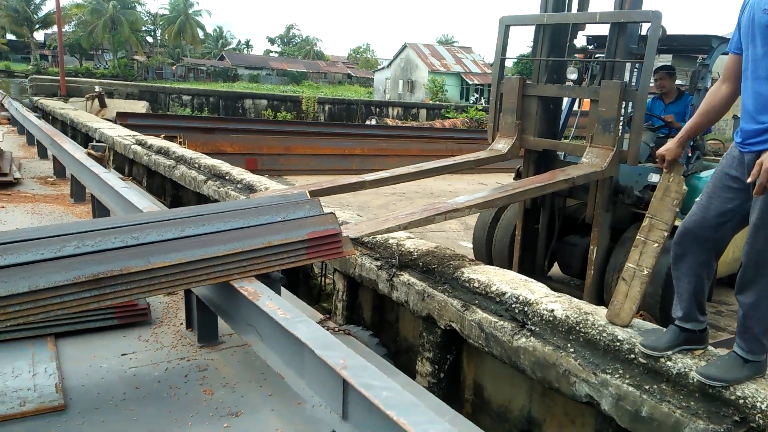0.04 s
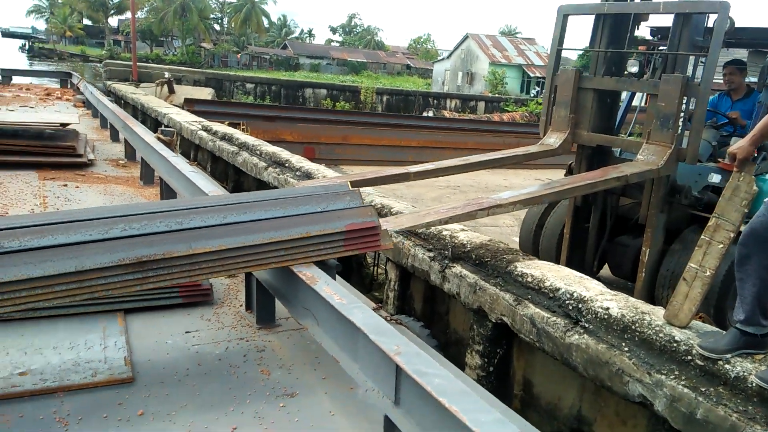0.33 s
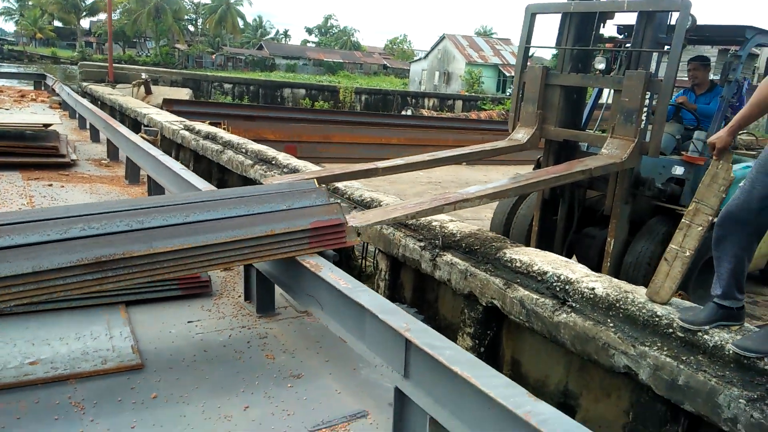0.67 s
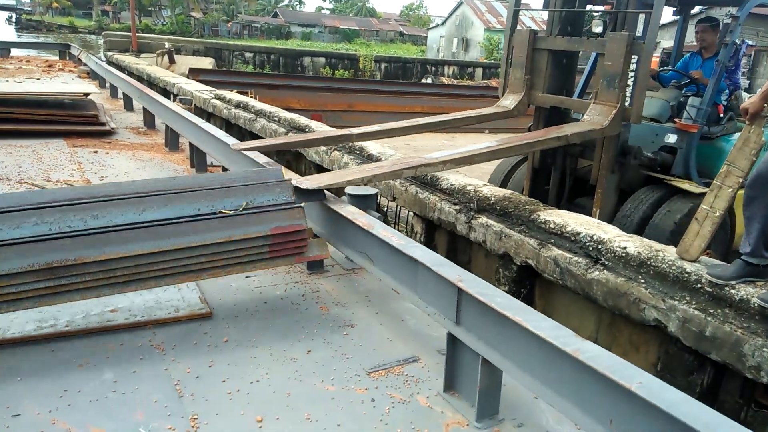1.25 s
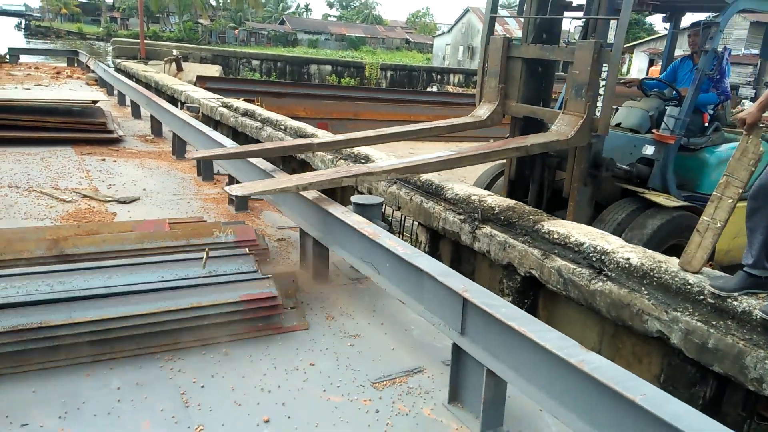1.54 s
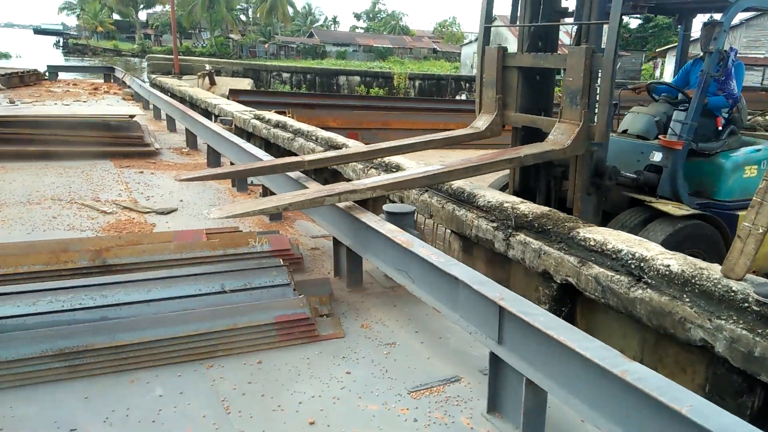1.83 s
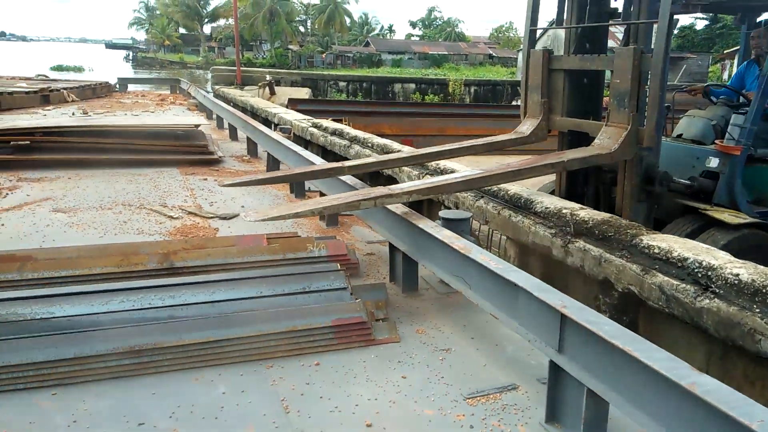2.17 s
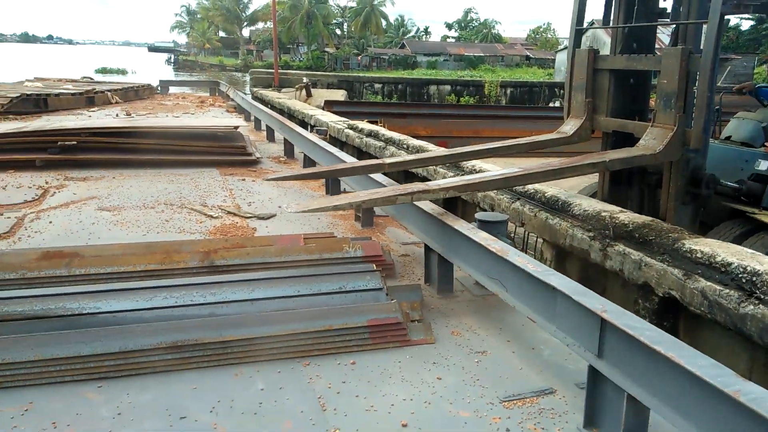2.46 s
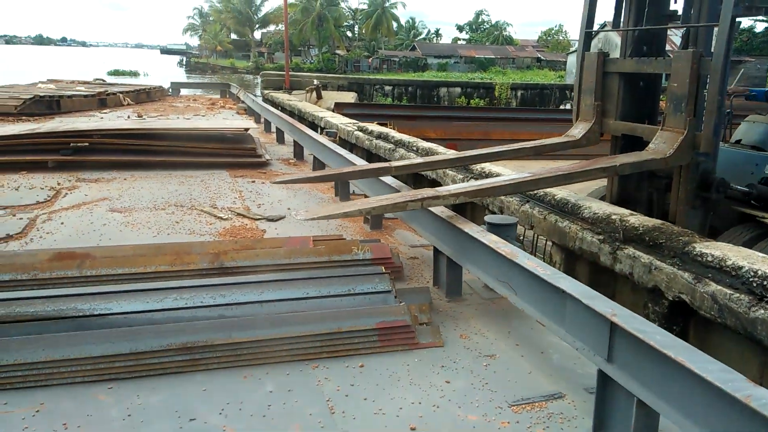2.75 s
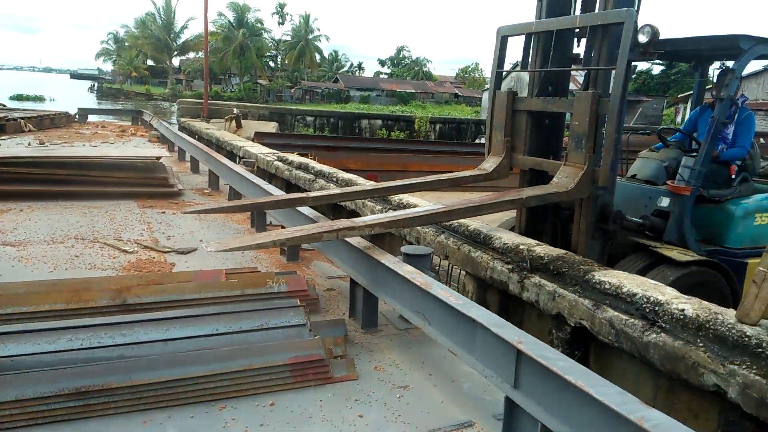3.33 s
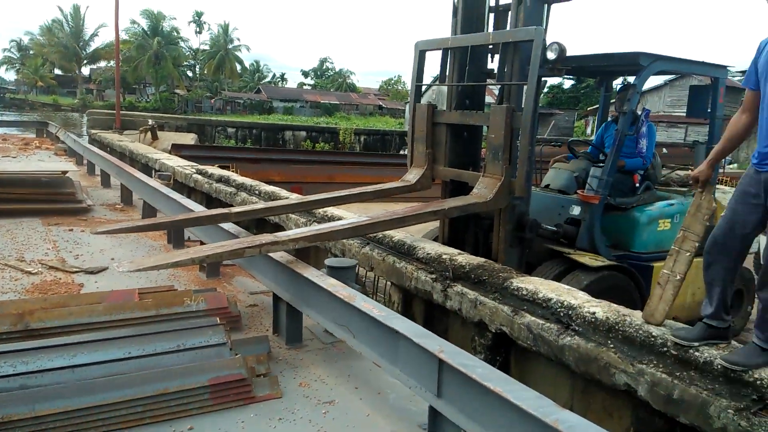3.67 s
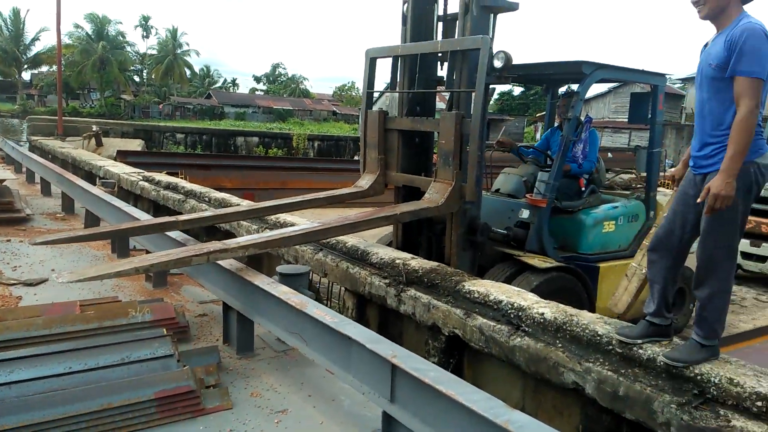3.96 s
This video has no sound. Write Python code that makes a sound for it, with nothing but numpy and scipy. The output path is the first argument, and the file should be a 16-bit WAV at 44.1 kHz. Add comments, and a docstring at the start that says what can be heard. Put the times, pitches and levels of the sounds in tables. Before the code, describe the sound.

Steel plates scrape haltingly off a chugging forklift, growing louder from about 0.5 seconds. At 1.3 seconds they crash onto a barge, clattering and ringing loudly until 2 seconds, while the hollow hull booms until about 2.5. The stack shifts again around 2.3 seconds. The engine puffs on more quietly under a faint hiss, with a knock from the empty forks at 3.3 seconds and a small tick at 3.6.

```python
"""At the quayside, in the open air: a forklift runs while steel plates scrape off its forks onto a barge.
The plates stick and slip, then crash, clatter and ring; the hollow hull booms, and the stack shifts once
more before it lies still. The engine puffs on more quietly, with a knock and a tick from the empty forks.
The sound sits in the centre, wide only in the treble, over a faint hiss. A limiter holds the crash down."""
import sys
import numpy as np
from scipy import signal
from scipy.fft import rfft, irfft
from scipy.io import wavfile
from scipy.ndimage import uniform_filter1d, minimum_filter1d

SR = 44100
rng = np.random.default_rng(int(sys.argv[2]) if len(sys.argv) > 2 else 0)


def int16_out(signal):
    """Quantize to a 16-bit WAV file."""
    q = np.round(np.clip(np.atleast_2d(signal).T, -1, 1) * 32767)
    wavfile.write(sys.argv[1], SR, q.astype(np.int16))


N = 176400

# single blows of steel on steel: (time [s], force [dB], hardness [dB], ringing [dB], pitch [Hz])
STEEL_BLOWS = [(.866, -32, -37, -16.5, 910), (1.105, -33.5, -4, -28, 2250), (1.273, -31, -14, -17, 2020),
               (1.3397, -13.5, -15, -20, 1056), (1.5014, -10, -6, -4.5, 972), (1.552, -6, -1, -20, 4224),
               (1.5555, -6.5, -15, -12, 1420), (1.6333, -14, -4, -6, 4300), (1.6623, -7.5, -1, -24, 1420),
               (1.7169, -11, -2, -5, 5300), (1.8199, -11, -6, -11.5, 4200), (1.835, -10, -30, -24, 6600),
               (1.8601, -13, -7, -10, 2160), (1.9491, -14, -20, -28, 4200), (2.006, -25, -27, -19.5, 1211),
               (2.2093, -23.5, -15, -34, 4530), (2.2612, -33.5, -4, -19.5, 1700),
               (2.2948, -24, -11, -35, 3370), (2.326, -36, -9, -28.5, 5900)]


def from_db(db):
    """Decibels to gain."""
    return 10 ** (np.asarray(db) / 20)


def rms_one(x):
    """Scale to rms 1."""
    return x / np.sqrt(np.mean(x ** 2) + 1e-20)


def in_time(rows):
    """Each column of a curve, sample by sample."""
    times, *columns = np.transpose(rows)
    return [np.interp(np.arange(N) / SR, times, column) for column in columns]


def during(rows):
    """A soft gate, open for the length of a curve."""
    t = np.arange(N) / SR
    return uniform_filter1d(1. * ((t >= rows[0][0]) & (t <= rows[-1][0])), size=800)


def evened(x, seconds):
    """Hold the running level at 1 and keep the fine grain."""
    power = uniform_filter1d(np.mean(np.atleast_2d(x) ** 2, axis=0), int(seconds * SR))
    return x / np.sqrt(np.abs(power) + 1e-12)


def noise(spectrum, size):
    """Stereo noise of a given colour, wide only in the treble."""
    # stereo width: (frequency [Hz], side minus mid [dB])
    stereo_width = [(2500, -70), (4000, -45), (6000, -13.5), (10000, -3.5)]
    log_hz = np.log(np.arange(size // 2 + 1) * SR / size + 1)
    gain, width = [from_db(np.interp(log_hz, np.log(hz), db))
                   for hz, db in (np.transpose(spectrum), np.transpose(stereo_width))]
    mid, side = rfft(rng.standard_normal((2, size))) * gain
    mid, side = irfft(mid, size), irfft(side * width, size)
    return (mid + side * [[1], [-1]]) / mid.std()


def contacts(per_s, spread_db):
    """Random touches, mostly small, a few large."""
    sizes = from_db(spread_db * np.minimum(rng.exponential(1, N), 4)) * rng.choice([-1, 1], N)
    return sizes * (rng.random(N) < per_s / SR)


def ring(clicks, hz, t60):
    """A unit click sets a decaying sine of height 1 ringing."""
    radius, angle = np.exp(-np.log(1000) / (t60 * SR)), 2 * np.pi * hz / SR
    return signal.lfilter([0, np.sin(angle)], [1, -2 * radius * np.cos(angle), radius ** 2], clicks + 1e-18)


def resonate(x, hz, width_hz):
    """One resonance, rms 1."""
    return rms_one(signal.lfilter(*signal.iirpeak(hz, hz / width_hz, fs=SR), x))


def bass_only(x):
    """Keep the range of a big hollow body."""
    return signal.sosfilt(signal.butter(4, [51, 230], "band", fs=SR, output="sos"), x)


def thicket(spectrum, t60):
    """Countless close modes swell within one cycle of the strongest and die together."""
    t = np.arange(2 ** 14) / SR
    strongest_hz = max(spectrum, key=lambda point: point[1])[0]
    swell = 1 - np.exp(-(t * strongest_hz) ** 2)
    return noise(spectrum, len(t)) * np.exp(-np.log(1000) * t / t60) * swell


def stack(clicks, colour, t60, plates, changes_per_s=70):
    """Contacts pass from plate to plate, and each plate has modes of its own."""
    touched = np.cumsum(rng.random(N) < changes_per_s / SR) % plates
    return sum(signal.fftconvolve([clicks * (touched == k)], thicket(colour, t60), axes=1)[:, :N]
               for k in range(plates))


def clink(at_s, db, hz, spread_octaves, t60, modes=16, swell_s=0.0024):
    """A cluster of close modes around one pitch, struck once."""
    mode_hz = hz * 2 ** (spread_octaves * rng.uniform(-1, 1, modes))
    t, start = np.arange(2 ** 13) / SR, int(at_s * SR)
    envelope = np.exp(-np.log(1000) * t / t60) * (1 - np.exp(-t / swell_s))
    cluster = envelope * (rng.standard_normal(modes) @ np.sin(2 * np.pi * np.outer(mode_hz, t)))
    out = np.zeros(N + SR)
    out[start:start + len(t)] = from_db(db) * rms_one(cluster) * np.sqrt(np.mean(envelope ** 2) / 2)
    return out[:N]


def hiss():
    """Faint treble hiss in the background sinks after the crash and comes back."""
    # course of the hiss: (time [s], level [dB])
    levels = [(0, -58), (1.2, -51), (2.1, -60.5), (2.6, -78), (2.9, -82), (2.96, -71.5), (3.12, -74.5),
              (3.3, -62.5), (3.65, -59), (4, -63)]
    # its colour: (frequency [Hz], relative density [dB])
    colour = [(1500, -9), (2400, -2), (3400, 0.5), (4900, 2.5), (6000, -6), (9000, -4.5), (11000, -15.5),
              (14500, -13.5)]
    return from_db(in_time(levels)[0]) * noise(colour, N)


def forklift(firings_per_s=29.6, jitter_cycles=0.049, spread_db=4.5, roughness=0.85, pulsing=0.22):
    """Uneven firings puff through the exhaust, shake the frame and pulse the mechanical clatter."""
    # the exhaust: (time [s], level [dB])
    exhaust_levels = [(0, -19.5), (.45, -20.5), (.6, -19), (1.04, -21.5), (1.2, -26), (1.33, -29),
                      (1.42, -40), (2.75, -31.5), (2.9, -40.5), (2.96, -30), (3.14, -35), (3.2, -39),
                      (3.28, -34.5), (3.48, -36.5), (3.51, -43.5), (3.82, -42), (3.88, -33.5), (4, -37)]
    # resonances of its pipe: (frequency [Hz], width [Hz], relative level [dB])
    pipe_modes = [(57, 11.7, 0), (78.2, 6.3, 3.5), (115.2, 19, 1.5), (133, 16, -5), (157.9, 8.2, -6.5)]
    # rumble of the frame: (frequency [Hz], relative density [dB])
    rumble_colour = [(25, -2), (160, 5), (235, 1), (290, 8), (450, 5), (700, -7), (2000, -49.5)]
    # clatter of the engine's moving parts: (time [s], level [dB])
    machinery_levels = [(0, -35.5), (1.1, -36.5), (2.2, -43.5), (2.75, -52), (3.05, -49), (3.65, -47),
                        (4, -49.5)]
    # its colour: (frequency [Hz], relative density [dB])
    machinery_colour = [(500, -9.5), (850, 7), (1150, 2), (1650, -6), (2000, -18.5), (2500, -22),
                        (4500, -65)]
    exhaust_db, = in_time(exhaust_levels)
    cycles = firings_per_s * np.arange(N) / SR
    firing = cycles.astype(int)
    timing, strength = rng.standard_normal((firing[-1] + 1, 2)).T
    phase = (cycles + jitter_cycles * timing[firing]) % 1
    puffs = from_db(spread_db * strength[firing]) * np.exp(-phase / 0.24)
    puffs = rms_one(uniform_filter1d(puffs, size=130))
    drive = rms_one(bass_only(puffs)) + roughness * rms_one(bass_only(rng.standard_normal(N)))
    pipe = sum((-1) ** k * from_db(db) * resonate(drive, hz, width)
               for k, (hz, width, db) in enumerate(pipe_modes))
    exhaust = from_db(exhaust_db) * evened(bass_only(pipe), seconds=0.044)
    rumble = from_db(1.477 * exhaust_db + 2.5) * noise(rumble_colour, N)  # grows faster than the exhaust
    machinery = from_db(in_time(machinery_levels)[0]) * noise(machinery_colour, N)
    return exhaust + (rumble + machinery) * rms_one(1 + pulsing * puffs)


def forks(overtone_ratio=1.55, overtone_db=-6.5, spread_octaves=0.302, t60=0.12):
    """The empty forks knock in their carriage: a short cluster of modes and its overtone."""
    # a knock and a tick: (time [s], level [dB], pitch [Hz])
    knocks = [(3.301, -28, 1021), (3.568, -45, 3400)]
    return sum(clink(at_s, db, hz, spread_octaves, t60)
               + clink(at_s, db + overtone_db, hz * overtone_ratio, spread_octaves, t60)
               for at_s, db, hz in knocks)


def slide():
    """The stack sticks and slips along the forks."""
    # the scrape: (time [s], level [dB])
    levels = [(0, -46), (.55, -33), (.74, -31), (.88, -24.5), (1.06, -24), (1.15, -31.5), (1.26, -22),
              (1.45, -36)]
    # its colour: (frequency [Hz], relative density [dB])
    colour = [(300, -6.5), (750, -0.5), (900, 8.5), (1150, -2.5), (1500, -2.5), (1800, -11), (2400, -12.5),
              (3100, -43), (14000, -53)]
    scrape = stack(contacts(per_s=900, spread_db=1.5), colour, t60=0.078, plates=2)
    return during(levels) * from_db(in_time(levels)[0]) * evened(scrape, seconds=0.054)


def hull():
    """The bouncing stack shakes the hollow barge, whose low modes swell and beat."""
    # the boom: (time [s], level [dB])
    levels = [(1.4, -62), (1.5, -27), (1.62, -11.5), (1.75, -14.5), (1.95, -16), (2.04, -12.5), (2.17, -11),
              (2.23, -15.5), (2.48, -17.5), (2.56, -26.5), (2.9, -46.5)]
    # modes of the hull: (frequency [Hz], width [Hz], relative level [dB])
    modes = [(73, 12, -3), (77.1, 11, -2.5), (100, 5.7, 5.5), (114.8, 7.4, 3), (132.4, 4.4, 5),
             (167, 7.3, -14), (191.2, 3.9, -5)]
    bounces = contacts(per_s=200, spread_db=3)
    boom = sum(from_db(db) * evened(resonate(bounces, hz, width), seconds=0.46) for hz, width, db in modes)
    return during(levels) * from_db(in_time(levels)[0]) * evened(bass_only(boom), seconds=0.089)


def plate_ringing(reach_octaves=0.08):
    """Each blow clinks at the pitch of its place of contact; long modes near that pitch swell and beat."""
    # long modes of the plates, in close pairs: (frequency [Hz], beat [Hz], gain [dB], t60 [s])
    mode_pairs = [(1211, 2.05, -3.5, 1.4), (1665, 6.2, -2, 0.35), (4240, 26, -9, .37),
                  (4120, 6.9, -9.5, .35), (6578, 46, -7.5, 0.52), (6600, 4.8, -11.5, 0.55)]
    times, _, _, ring_db, pitch_hz = np.transpose(STEEL_BLOWS)
    out = sum(clink(at_s, db - 1, hz, spread_octaves=0.09, t60=0.13) for at_s, _, _, db, hz in STEEL_BLOWS)
    for hz, beat_hz, db, t60 in mode_pairs:
        nearness = np.exp(-(np.log2(hz / pitch_hz) / reach_octaves) ** 2)
        clicks = np.zeros(N)
        clicks[(times * SR).astype(int)] = from_db(ring_db + db) * nearness
        out += ring(clicks, hz, t60) - ring(clicks, hz + beat_hz, t60)
    return out


def blows(times, levels_db, colour, t60):
    """Each blow wakes a thicket of modes of its own."""
    out = np.zeros((2, N + SR))
    for at_s, db in zip(times, levels_db):
        start, body = int(at_s * SR), thicket(colour, t60)
        out[:, start:start + body.shape[1]] += from_db(db) * body
    return out[:, :N]


def plate_crash(even_s=0.088):
    """Plates thud on the deck and chatter on one another; harder contacts wake the higher registers."""
    # the falling stack: (time [s], force [dB], hardness of the contacts [dB], thud level [dB])
    fall = [(1.22, -47, -13, -58), (1.275, -21.5, -18.5, -25.5), (1.296, -17.5, -31, -14.5),
            (1.355, -9, -18, -17.5), (1.435, -13.5, -22.5, -25.5), (1.452, -10, -17.5, -6),
            (1.495, -9.5, -8.5, -13.5), (1.515, -9.5, -3, -12.5), (1.66, -4.5, -6, -7.5),
            (1.705, -6.5, -9, -10), (1.85, -12.5, -9, -16), (1.92, -13, -14, -22), (2.01, -13.5, -18, -25),
            (2.06, -24, -21.5, -20), (2.2, -41, -31, -27.5), (2.225, -29.5, -12, -20.5),
            (2.285, -18, -20.5, -23.5), (2.355, -29.5, -5.5, -32), (2.39, -27.5, -14, -37.5),
            (2.43, -41.5, -18.5, -36), (2.7, -78, -21, -72)]
    # four registers of the stack, low to high: (frequency [Hz], relative density [dB])
    thud = [(90, -37.5), (180, -0.5), (230, -5), (310, 3), (450, 10.5), (620, -3), (900, -12.5),
            (2000, -54.5)]
    clang = [(250, -25.5), (800, -5), (1000, 1), (1250, 2), (1500, -1.5), (1900, -8), (2500, -17.5),
             (3300, -27.5), (12000, -66.5)]
    clash = [(1200, -19), (2500, 5), (3100, -0.5), (3700, -4.5), (4300, 3), (5300, -1), (6400, -8),
             (7500, -17.5), (10000, -21.5), (14000, -38.5)]
    sizzle = [(3500, -20), (6000, 4), (7500, 2), (9800, 1.5), (11000, -3.5), (14500, -5.5)]
    # the upper three: (colour, t60 [s], growth with hardness [dB/dB], gain [dB])
    registers = [(clang, 0.16, 0, 0), (clash, 0.13, 1, 0), (sizzle, 0.054, 2.03, 0.5)]
    force, hardness, thud_db = in_time(fall)
    blow_times, blow_force, blow_hardness, _, _ = np.transpose(STEEL_BLOWS)
    chatter, gate = contacts(per_s=500, spread_db=4), during(fall)
    out = gate * from_db(thud_db) * evened(stack(chatter, thud, t60=0.19, plates=2), even_s)
    for colour, t60, growth, db in registers:
        clatter = evened(stack(chatter, colour, t60, plates=3), even_s)
        out += gate * from_db(db + force + growth * hardness) * clatter
        out += blows(blow_times, db + blow_force + growth * blow_hardness, colour, t60)
    return out


def scene():
    """Forklift, plates and barge as they reach the microphone on the quay."""
    return forklift() + forks() + hiss() + slide() + plate_crash() + plate_ringing() + hull()


def record(dry):
    """Narrow dips colour the low mids, a fast limiter holds the peaks, the top is cut."""
    ceiling_db, release_db_per_s, lookahead_s, cutoff_hz = -1, 604.5, 0.0015, 14250
    for hz, q in ((378, 5.5), (526, 7.7)):
        dry = signal.lfilter(*signal.iirnotch(hz, q, fs=SR), dry)
    over_db = np.maximum(20 * np.log10(np.abs(dry).max(axis=0) + 1e-9) - ceiling_db, 0)
    release_db = release_db_per_s * np.arange(N) / SR
    cut_db = np.maximum.accumulate(over_db + release_db) - release_db
    ahead = int(lookahead_s * SR)
    held = dry * from_db(uniform_filter1d(minimum_filter1d(-cut_db, ahead), ahead))
    return signal.sosfilt(signal.ellip(12, .2, 80, cutoff_hz, fs=SR, output="sos"), held)


dry = scene()
out = record(dry)
int16_out(out)
```